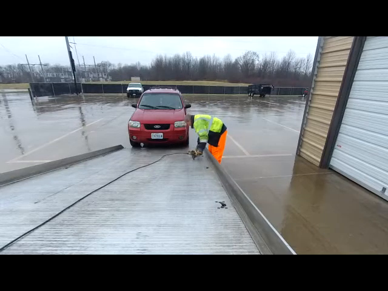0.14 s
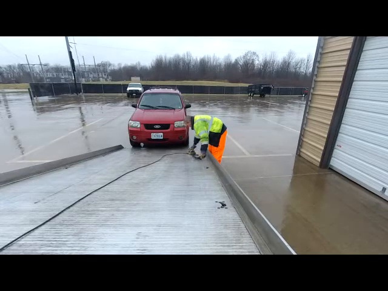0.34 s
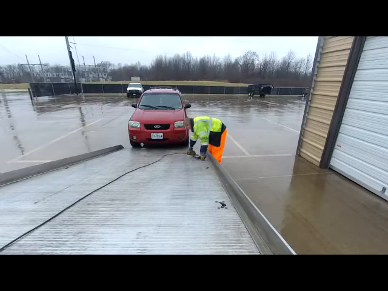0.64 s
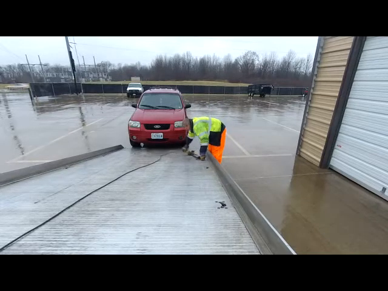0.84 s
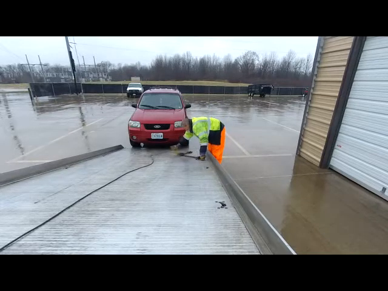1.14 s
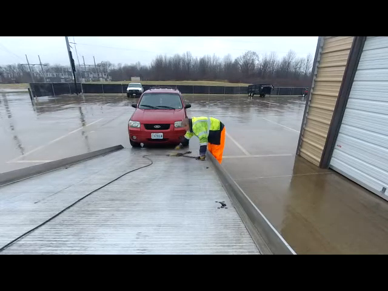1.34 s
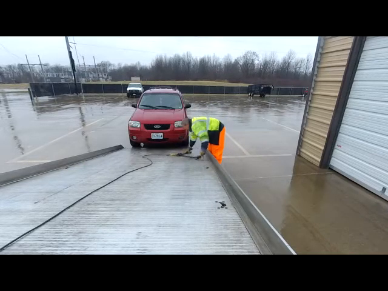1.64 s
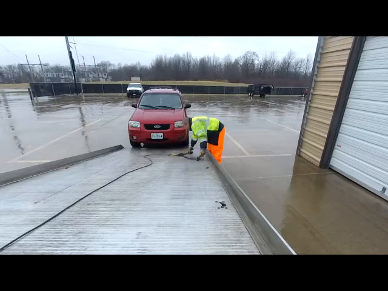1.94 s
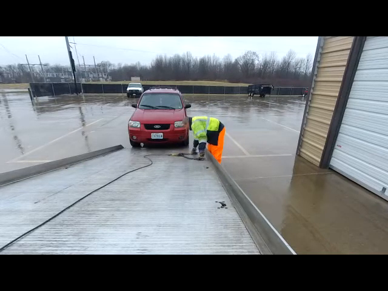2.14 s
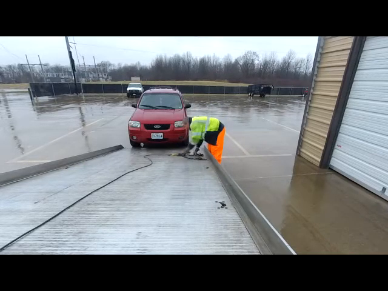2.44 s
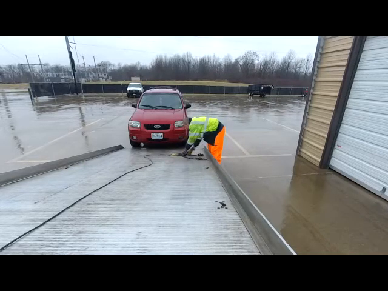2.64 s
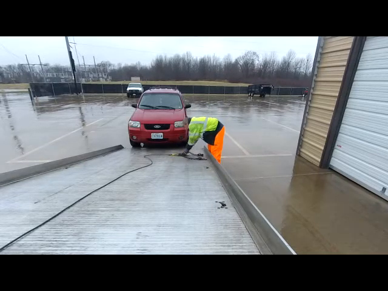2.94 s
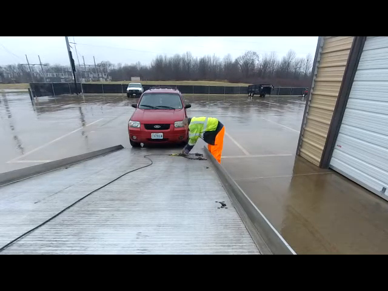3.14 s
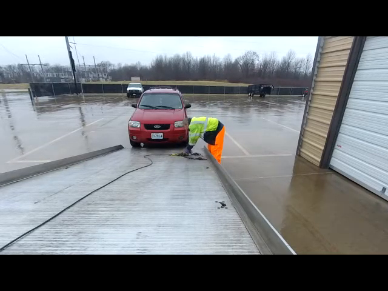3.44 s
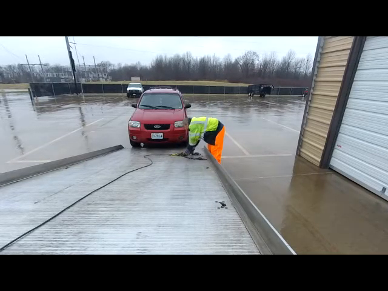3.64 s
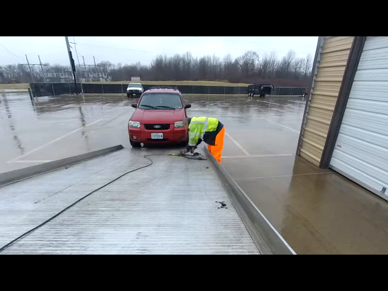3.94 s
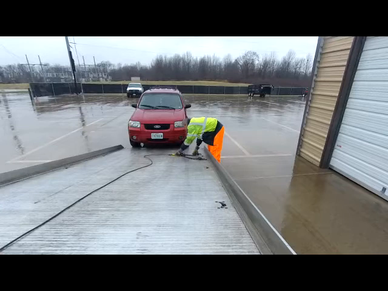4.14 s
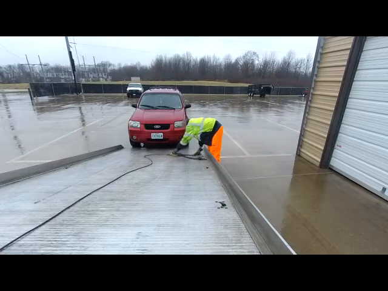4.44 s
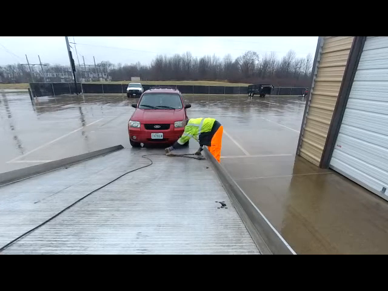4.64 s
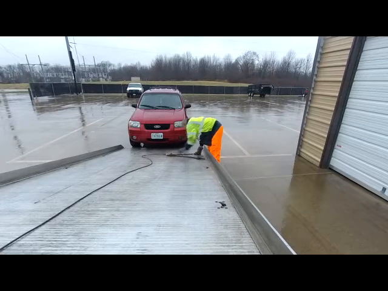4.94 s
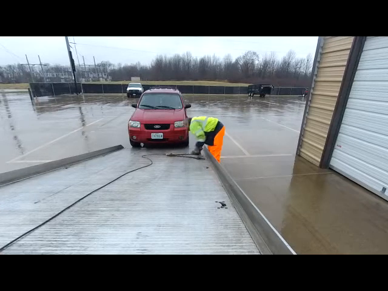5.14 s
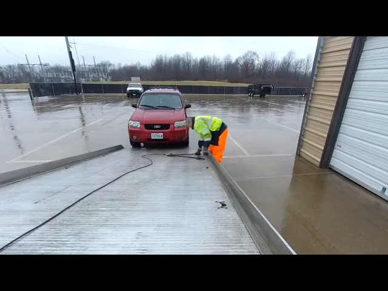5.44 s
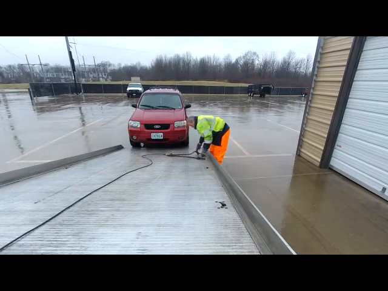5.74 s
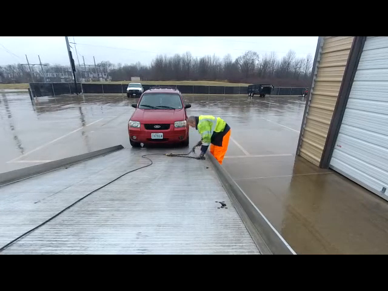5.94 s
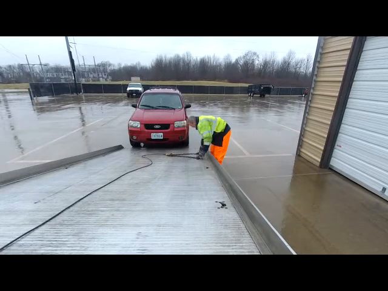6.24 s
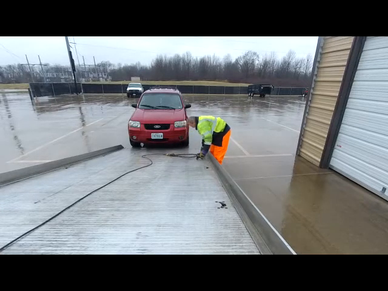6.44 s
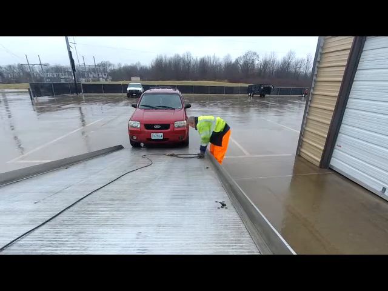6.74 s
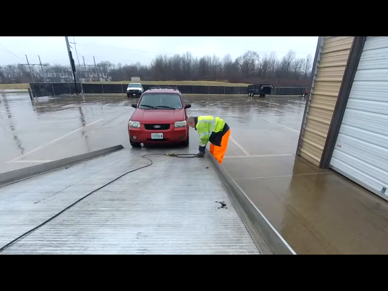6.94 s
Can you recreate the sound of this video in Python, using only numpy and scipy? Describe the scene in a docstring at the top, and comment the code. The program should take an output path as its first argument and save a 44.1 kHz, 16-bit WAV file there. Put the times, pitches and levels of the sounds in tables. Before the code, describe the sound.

A worker handles steel chain and hooks at the foot of a tilted metal truck deck in a wet yard. Light rattles lead to firm knocks, then a loud clatter around two seconds with scraping and bright jingling. Sparse small clinks follow, almost settling near five seconds, before another ringing burst at the end. A faint pump hum and soft hiss continue beneath, with short outdoor echoes, heard from a few metres away.

```python
"""Outdoor yard: a steel tow chain and hooks dragged, lifted and dropped at the foot of a tilted metal truck
deck. Hooks knock the deck: grain bursts through its colour and rings, with a delayed frame boom. Links scrape
as dense contacts and jingle as resonators; links and hook clink as beating, damped sines. The truck's pump hums
as wavering sines over a soft hiss of coloured noise; the yard adds echoes."""
import sys
import numpy as np
from scipy import signal
from scipy.fft import rfft, irfft
from scipy.io import wavfile
from scipy.ndimage import uniform_filter1d

SR = 44100
rng = np.random.default_rng(int(sys.argv[2]) if len(sys.argv) > 2 else 0)


def output_pcm(signal):
    """Save a mono or channel-first signal as 16-bit PCM at the path in sys.argv[1].

    Samples are clipped to [-1, 1] before scaling.
    """
    pcm = np.clip(np.atleast_2d(signal).T, -1, 1) * 32767
    wavfile.write(sys.argv[1], SR, np.round(pcm).astype(np.int16))


def natural_amplitude(level_db):
    """Convert a level in decibels to a linear amplitude factor, elementwise."""
    exponent = np.asarray(level_db, float) / 20
    return 10 ** exponent


N = 312657
T = np.arange(N) / SR

# hooks and chain landing: start_s, level_db, treble_db and bass_db (both re knock), t60_s
KNOCK_EVENTS = [(0.017, -42, -1, -9, 0.09), (0.039, -43, -3, -23.5, 0.05), (0.144, -45.5, -20, -27, 0.069),
                (0.179, -38.5, -2.5, -34, 0.17), (0.205, -47, 1.5, -35, 0.26),
                (0.245, -29.5, 0, -42, 0.033), (0.261, -34, -0.5, -25, 0.22), (0.286, -34, -1, -13, 0.12),
                (0.47, -41.5, -5, -26, 0.17), (0.564, -42.5, -12, -20, 0.079), (0.8, -47, -4, -29, 0.15),
                (1.03, -47, -2, -29, 0.08), (1.129, -41, -5, -30, 0.14), (1.201, -33, -3.5, -4, 0.076),
                (1.278, -23.5, -5.5, -3.5, 0.039), (1.309, -30.5, -4.5, -19, 0.076),
                (1.716, -42, -2.5, -38, 0.15), (1.788, -46.5, -2.5, -32, 0.13),
                (1.932, -23.5, -7.5, -14, 0.04), (1.985, -23, 0, -38, 0.066), (2.033, -32.5, -3, -32, 0.05),
                (2.078, -31, 1, -29, 0.064), (2.111, -29, -4, -46, 0.08), (2.149, -35, -4, -35, 0.054),
                (2.171, -35, -4, -21, 0.17), (2.269, -33.5, -8.5, -37, 0.17), (2.305, -42, -6, -24, 0.14),
                (2.364, -43, -4.5, -33, 0.17), (2.436, -38.5, -3, -15, 0.11), (2.617, -48, 0, -20, 0.051),
                (3.034, -53, -12.5, -23, 0.045), (3.163, -44, -8, -20, 0.08), (3.224, -42.5, -3, -35, 0.16),
                (3.366, -48.5, -3, -30, 0.11), (3.532, -44, -2.5, -20, 0.061),
                (3.613, -44.5, -1.5, -36, 0.19), (3.683, -52.5, -17, -30, 0.12),
                (3.737, -49, -2.5, -28, 0.23), (3.843, -44, -1.5, -27, 0.18), (3.898, -41.5, -2, -32, 0.15),
                (3.926, -31, 0.5, -18.5, 0.14), (4.018, -46.5, -1.5, -32, 0.26),
                (4.331, -47, -4, -24, 0.16), (4.449, -41.5, -1, -18, 0.18), (4.504, -43.5, -7, -31, 0.14),
                (4.622, -30.5, -5, -14.5, 0.17), (5.08, -54, 0.5, -28, 0.07), (5.597, -57, -10, -28, 0.079),
                (5.78, -49.5, -5.5, -18, 0.11), (5.826, -43.5, -5, -4, 0.088),
                (5.903, -47.5, -4, -33, 0.093), (6, -51.5, -3, -26.5, 0.079), (6.21, -29.5, 2, -22, 0.21),
                (6.257, -24.5, -4.5, -14.5, 0.078), (6.294, -26.5, -4.5, -18.5, 0.16),
                (6.511, -30, -5, -39.5, 0.25), (6.55, -41, 3.5, -36, 0.16), (6.676, -34, -3, -37, 0.033),
                (6.703, -34.5, -3, -41, 0.34), (6.85, -39.5, -9, -31, 0.4), (6.924, -39.5, -1.5, -43, 0.17),
                (6.971, -41.5, -10, -34, 0.32)]
# clearest rings of struck links and hook: start_s, level_db, pitch_hz, t60_s
CLINK_EVENTS = [(0.034, -40, 4410, 0.044), (0.083, -43, 6100, 0.061), (0.085, -48, 7970, 0.06),
                (0.183, -48, 7240, 0.057), (0.244, -43, 7380, 0.081), (0.29, -48.5, 9000, 0.29),
                (0.294, -35, 7390, 0.11), (0.464, -52, 7340, 0.11), (1.202, -48, 7430, 0.062),
                (1.289, -33.5, 6410, 0.05), (1.57, -56.5, 7400, 0.1), (1.779, -51, 7600, 0.15),
                (1.85, -45, 7700, 0.031), (1.942, -37, 7450, 0.22), (1.943, -53, 10500, 0.25),
                (1.983, -40, 5500, 0.092), (2.076, -39, 4500, 0.1), (2.08, -34.5, 6090, 0.19),
                (2.082, -33, 7850, 0.17), (2.12, -41, 8370, 0.27), (2.149, -40, 5790, 0.14),
                (2.151, -39.5, 6130, 0.23), (2.185, -51, 11400, 0.18), (2.28, -50.5, 4500, 0.2),
                (2.329, -47, 6230, 0.27), (2.332, -45, 7800, 0.09), (2.371, -51, 4500, 0.18),
                (2.437, -49, 7700, 0.09), (3.257, -40.5, 7970, 0.042), (3.34, -57, 5357, 0.2),
                (3.371, -49, 8130, 0.075), (3.386, -54, 5330, 0.18), (3.415, -41.5, 7870, 0.082),
                (3.472, -55.5, 5350, 0.1), (3.557, -54, 7360, 0.059), (3.841, -42.5, 7930, 0.045),
                (3.92, -50, 7740, 0.06), (4.375, -55, 4700, 0.053), (4.451, -54, 5500, 0.12),
                (4.451, -40.5, 7370, 0.14), (4.508, -54, 7580, 0.16), (4.624, -47, 7760, 0.081),
                (4.705, -46.5, 5450, 0.076), (4.912, -58, 7400, 0.051), (5.879, -48.5, 7940, 0.098),
                (6.073, -54, 7880, 0.086), (6.209, -54, 7400, 0.073), (6.212, -48, 14430, 0.11),
                (6.257, -43, 7530, 0.24), (6.301, -46, 7350, 0.29), (6.488, -55, 7450, 0.069),
                (6.516, -47, 7380, 0.07), (6.525, -39, 6090, 0.07), (6.575, -45, 7900, 0.13),
                (6.583, -37, 4440, 0.055), (6.602, -25.5, 7750, 0.046), (6.68, -39, 7460, 0.25),
                (6.689, -46, 4500, 0.15), (6.697, -60, 9810, 0.2), (6.726, -41, 7390, 0.11),
                (6.733, -49.5, 8940, 0.4), (6.777, -43, 7350, 0.07), (6.802, -47, 6100, 0.15),
                (6.864, -44, 6090, 0.23), (6.865, -44, 7380, 0.42), (6.968, -46, 6140, 0.13),
                (6.969, -42, 7280, 0.15), (7.037, -48, 7470, 0.078)]
# modes of links and hook: mode_hz, spread_hz (between links), level_db
LINK_MODES = [(4500, 50, -2), (5400, 50, -10), (6090, 30, -7), (6280, 30, -12), (7320, 40, -2),
              (7400, 40, 0), (7500, 30, -1), (7740, 30, -2), (7860, 40, -1), (8000, 60, -4), (8220, 50, -6),
              (8380, 25, -7), (8930, 15, -12), (9810, 20, -16), (10500, 30, -18), (10800, 40, -20),
              (11100, 30, -20), (11500, 30, -20), (12000, 30, -20), (14300, 40, -17), (14900, 70, -22)]
# chain dragged, breakpoints: time_s, scrape_db, jingle_db
DRAG_LEVELS = [(0.0, -40, -51.5), (0.14, -54.5, -69), (0.33, -48, -56), (0.6, -61, -81), (0.95, -52, -84),
               (1.22, -42, -67), (1.4, -54, -77), (1.92, -55.5, -72), (1.99, -35, -39.5), (2.1, -42, -47),
               (2.47, -48, -54), (2.57, -55.5, -100), (2.94, -64, -96), (3.22, -49.5, -71), (3.4, -55, -60),
               (3.65, -66, -75), (3.95, -59, -68), (4.4, -58.5, -85), (4.48, -51.5, -51), (4.62, -48, -61),
               (4.67, -45, -48), (4.84, -55, -72.5), (5.41, -64.5, -88), (6.19, -58.5, -69.5),
               (6.33, -42.5, -50), (6.48, -48, -71), (6.6, -44, -47), (7.09, -46, -67)]
# broad colour of the deck: freq_hz, gain_db (per Hz)
DECK_COLOUR = [(35, -39), (60, -59), (183, -21), (443, -18), (599, -11.5), (1070, -6), (1230, -2.5),
               (1380, -6), (2100, -11), (4420, -3.5), (6260, -12.5), (6870, -16.5), (7720, -16.5),
               (8870, -19.5), (15500, -31)]
# short deck modes: mode_hz, width_hz, level_db
DECK_MODES = [(870, 18, -22), (1251, 38, -9.5), (1836, 130, -26), (2983, 470, 1), (4500, 160, -29)]
# pump tones before wavering and IDLE_LEVEL: tone_hz, rms_db
PUMP_TONES = [(112, -90), (247, -79.5), (494, -74), (813, -67.5), (986, -80.5), (1203, -62.5), (1260, -77),
              (1483, -95), (1626, -97), (1803, -75), (2266, -80.5), (2406, -77)]
# colour of the hiss: freq_hz, gain_db (per Hz)
HISS_COLOUR = [(30, 6), (70, -29), (170, -13.5), (300, -39), (450, -11), (700, -6), (1000, 2.5),
               (1280, -24), (1500, -2), (2100, -10.5), (2900, -6.5), (4300, -14.5), (8000, -20),
               (15500, -20)]
# hum and hiss sink for a while, breakpoints: time_s, gain_db
IDLE_LEVEL = [(0, 3.5), (1, 1.5), (2.6, 4), (3.8, 0.5), (4.3, 2.5), (5.2, 0.5), (5.7, -2.5), (6.2, -1),
              (7.09, 5)]

HISS_DB = -61  # rms before flicker and IDLE_LEVEL
BASS_HZ, SPLIT_HZ, TOP_HZ = 500, 3500, 8000
OVERTONE_RATIO, OVERTONE_DB, OVERTONE_SCATTER_DB = 1.96, -24, 4
SCRAPE_TREBLE_DB = -6


def unit(x):
    """Scale to rms 1."""
    return x / np.sqrt(np.mean(x ** 2))


def colour(x, points):
    """Causal minimum-phase filter through (Hz, dB) points, from the cepstrum of the log gain."""
    hz, db = np.transpose(points)
    size = 2 ** 12
    bin_hz = np.arange(size // 2 + 1) * SR / size
    log_gain = np.interp(np.log(bin_hz + 1), np.log(hz), db) * np.log(10) / 20
    cepstrum = irfft(log_gain)
    # fold onto positive time
    cepstrum[1:size // 2] *= 2
    cepstrum[size // 2 + 1:] = 0
    impulse = irfft(np.exp(rfft(cepstrum)))
    return signal.fftconvolve(x, impulse)[:len(x)]


def band(x, kind, hz):
    """Third-order Butterworth low, band or high pass."""
    return signal.sosfilt(signal.butter(N=3, Wn=hz, btype=kind, fs=SR, output="sos"), x)


def ring(x, hz, width_hz):
    """One damped mode driven by x, gain about 1 at its centre."""
    pole = np.exp((2j * hz - width_hz) * np.pi / SR)
    return 2 * (1 - abs(pole)) * signal.lfilter([1], [1, -pole], x).imag


def walk(rate_hz):
    """Random levels held 1 / rate_hz s and slewed twice."""
    hold = int(SR / rate_hz)
    steps = np.repeat(rng.standard_normal(N // hold + 1), hold)
    return uniform_filter1d(uniform_filter1d(steps, hold), hold)[:N]


def grains(rate_hz, spread_db):
    """Random contacts, most small and a few larger."""
    hits = rng.random(N) < rate_hz / SR
    return hits * rng.standard_normal(N) * natural_amplitude(spread_db * rng.standard_normal(N))


def deck(force, rings_db):
    """Metal deck answers force with broad colour and short rings; split in bass, middle, treble, top."""
    rings = sum(natural_amplitude(db) * ring(force, hz, width_hz) for hz, width_hz, db in DECK_MODES)
    sound = colour(force + natural_amplitude(rings_db) * rings, DECK_COLOUR)
    low = unit(band(sound, "low", BASS_HZ))
    mid = unit(band(sound, "band", [BASS_HZ, SPLIT_HZ]))
    high = unit(band(sound, "high", SPLIT_HZ))
    return low, mid, band(high, "low", TOP_HZ), band(high, "high", TOP_HZ)


def pump():
    """Steady tones, each wavering a little in pitch and level, with one waver in common."""
    waver = natural_amplitude(1.0 * walk(2.05))
    tones = np.zeros(N)
    for hz, db in PUMP_TONES:
        level = waver * natural_amplitude(db + 2 * walk(5.4)) * np.sqrt(2)
        pitch_hz = hz * (1 + walk(2.0) / 1500)
        tones += level * np.sin(2 * np.pi * np.cumsum(pitch_hz) / SR)
    return tones


def air():
    """Soft broad hiss: coloured noise with a slow flicker in level."""
    flicker = natural_amplitude(walk(5))
    return natural_amplitude(HISS_DB) * flicker * unit(colour(rng.standard_normal(N), HISS_COLOUR))


def idle():
    """Pump and hiss rise and sink together."""
    return (pump() + air()) * natural_amplitude(np.interp(T, *np.transpose(IDLE_LEVEL)))


def jingle():
    """Loose links of slightly different size jostle; each contact sets one mode ringing."""
    out = np.zeros(N)
    for hz, spread_hz, db in LINK_MODES:
        for detune in rng.standard_normal(2):
            link_hz = hz + spread_hz * detune
            contacts = grains(rate_hz=90, spread_db=5)
            # the second, wider resonance softens the onset
            out += natural_amplitude(db) * ring(ring(contacts, link_hz, 30), link_hz, 250)
    return unit(out)


def drag():
    """Links bump over the ribbed deck in dense tiny contacts, and jingle."""
    time_s, *columns = np.transpose(DRAG_LEVELS)
    scrape_db, jingle_db = (np.interp(T, time_s, c) for c in columns)
    force = grains(rate_hz=9000, spread_db=2.0) * natural_amplitude(2.84 * walk(80))
    low, mid, high, top = deck(force, rings_db=-7.0)
    scrape = mid + natural_amplitude(SCRAPE_TREBLE_DB) * (high + natural_amplitude(-12) * top) + natural_amplitude(-16.5) * low
    return natural_amplitude(scrape_db) * scrape + natural_amplitude(jingle_db) * jingle()


def knocks():
    """Links touch just before the blow and rattle on after it; treble dies first, bass comes late."""
    force = grains(rate_hz=21000, spread_db=1.77) * natural_amplitude(2.44 * walk(250))
    low, mid, high, top = deck(force, rings_db=-7.5)
    out = np.zeros(N)
    for start_s, db, treble_db, bass_db, t60_s in KNOCK_EVENTS:
        i = int(start_s * SR)
        part = slice(max(i - SR // 20, 0), i + SR // 2)
        t = T[part] - start_s
        after = np.maximum(t, 0)
        rise = np.exp(np.minimum(t, 0) / 0.0021)
        fall = np.log(1000) * after / max(t60_s, 0.01)
        # a harder blow makes a shorter contact, so more of the very top
        top_gain = natural_amplitude(0.18 * db - 1.5) * (1 - np.exp(-after / 0.004))
        bright = high[part] + top_gain * top[part]
        rattle = rise * (mid[part] * np.exp(-fall) + natural_amplitude(treble_db) * bright * np.exp(-1.2 * fall))
        # the blow itself rings the deck's modes once
        clang = sum(natural_amplitude(mode_db) * np.sin(2 * np.pi * hz * after) * np.exp(-np.pi * width_hz * after)
                    for hz, width_hz, mode_db in DECK_MODES)
        clang = natural_amplitude(5) * clang * (1 - np.exp(-after / 0.00029))
        # the truck frame booms under the deck
        frame = np.sin(2 * np.pi * 110 * after) + np.sin(2 * np.pi * 170 * after)
        boom = low[part] + natural_amplitude(-15.5) * frame
        thud = natural_amplitude(bass_db) * boom * (1 - np.exp(-after / 0.012)) * np.exp(-0.7 * fall)
        out[part] += natural_amplitude(db) * (rattle + clang + thud)
    return out


def clinks():
    """A struck link or hook sings as a close beating pair, damped ever harder; its neighbours chip in briefly."""
    hz, spread_hz, mode_db = np.transpose(LINK_MODES)[:, :, None]
    chance = rng.standard_normal((len(CLINK_EVENTS), 3, len(LINK_MODES), 1))
    out = np.zeros(N)
    for (start_s, db, pitch_hz, t60_s), (size, detune, lag) in zip(CLINK_EVENTS, chance):
        i = int(start_s * SR)
        t = T[:min(N - i, SR // 3)]
        span_s = max(t60_s, 0.01)
        twin_hz = pitch_hz * (1 + detune[0] / 400)
        pair = np.sin(2 * np.pi * pitch_hz * t) + 0.4 * np.sin(2 * np.pi * twin_hz * t)
        # the mode nearest an octave up sounds with it
        upper_hz = hz[np.argmin(abs(hz - OVERTONE_RATIO * pitch_hz)), 0]
        upper_db = OVERTONE_DB + OVERTONE_SCATTER_DB * size[0]
        pair += natural_amplitude(upper_db) * np.sin(2 * np.pi * upper_hz * t)
        tone = pair * np.exp(-np.log(1000) * (t / span_s) ** 1.22)
        late = np.maximum(t[:SR // 12] - 0.0044 * abs(lag), 0)
        # modes far from the struck one are barely stirred
        near_db = -10 * abs(np.log2(hz / pitch_hz))
        others = natural_amplitude(mode_db + near_db - 11 + 5 * size) * np.sin(2 * np.pi * (hz + spread_hz * detune) * late)
        others *= np.exp(-np.log(1000) * late / (0.75 * span_s))
        tone[:late.shape[1]] += others.sum(axis=0)
        out[i:i + len(t)] += natural_amplitude(db) * tone * (1 - np.exp(-(t / 0.0027) ** 2))
    return out


def yard(x, t60_s, echo_db):
    """Scattered echoes from car, wet ground and garage wall: a decaying noise tail after 4 ms."""
    t = T[:SR // 2]
    tail = rng.standard_normal(len(t)) * np.exp(-np.log(1000) * t / t60_s) * (t > 0.004)
    tail /= np.sqrt(np.sum(tail ** 2))
    return x + natural_amplitude(echo_db) * signal.fftconvolve(x, tail)[:N]


def scene():
    """Chain in the yard, over the idling truck; the thin treble rings carry less echo."""
    truck = idle()
    chain = yard(drag() + knocks(), t60_s=0.39, echo_db=-5.5)
    rings = yard(clinks(), t60_s=0.069, echo_db=-15.0)
    return (truck + chain + rings)[None]


def band_limit(x):
    """A steep low-pass at the top of the band."""
    return signal.sosfilt(signal.butter(12, 15830, fs=SR, output="sos"), x)


def record(dry):
    """The microphone drops the deep bass, below 97 Hz."""
    mix = band(dry, "high", 97)
    return band_limit(mix)


dry = scene()
out = record(dry)
output_pcm(out)
```